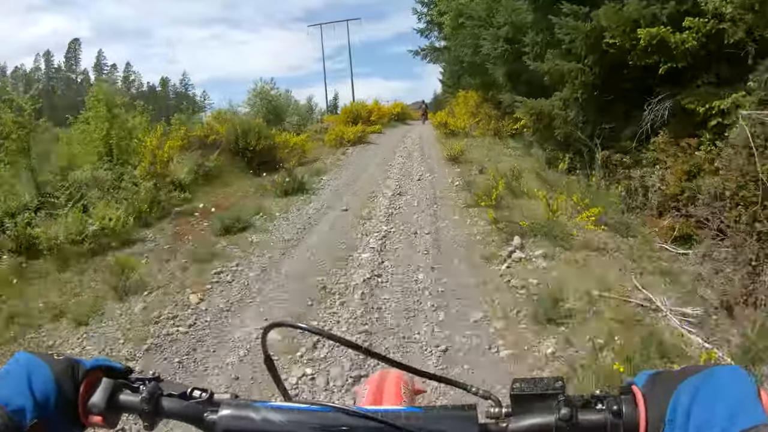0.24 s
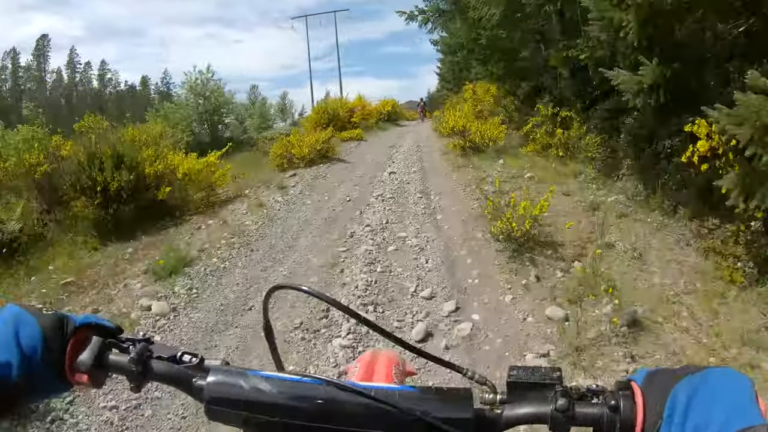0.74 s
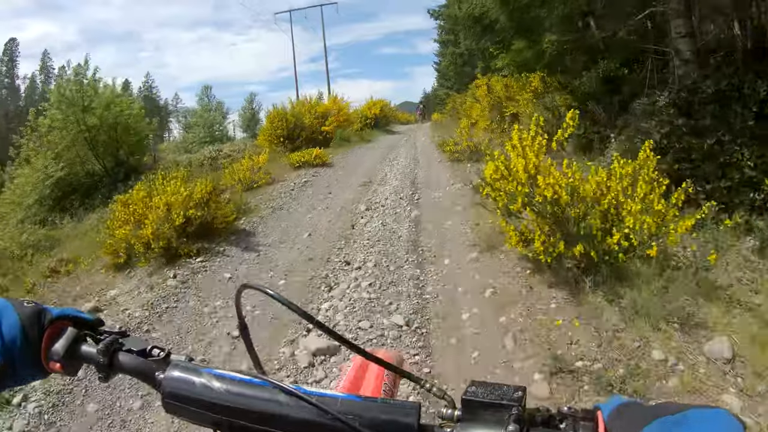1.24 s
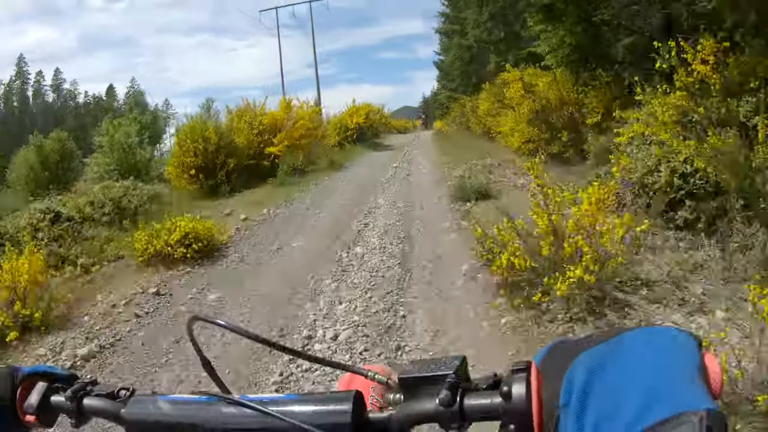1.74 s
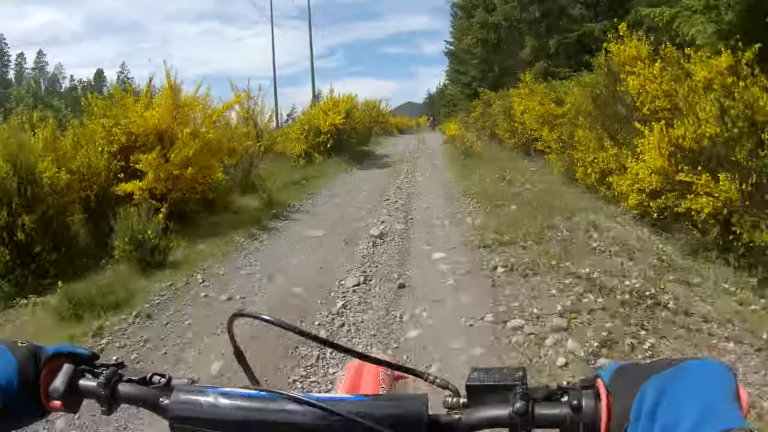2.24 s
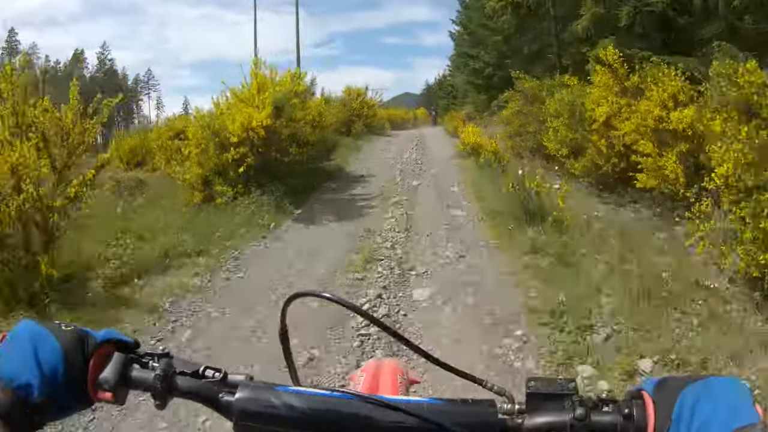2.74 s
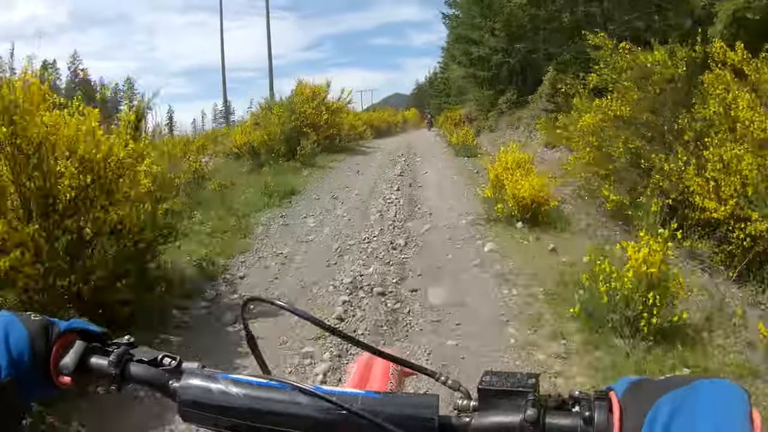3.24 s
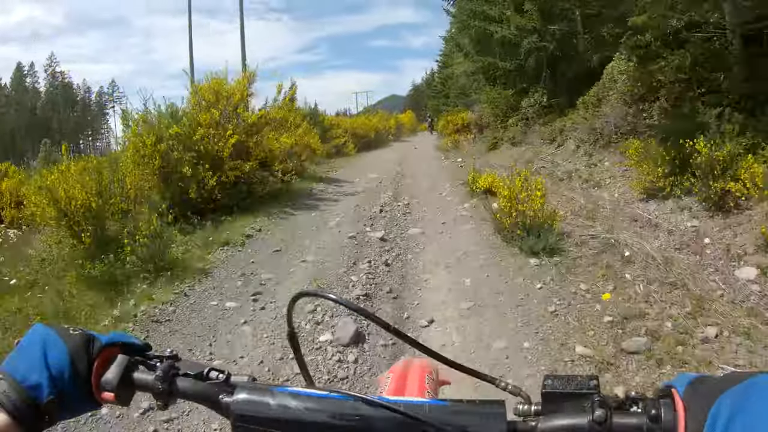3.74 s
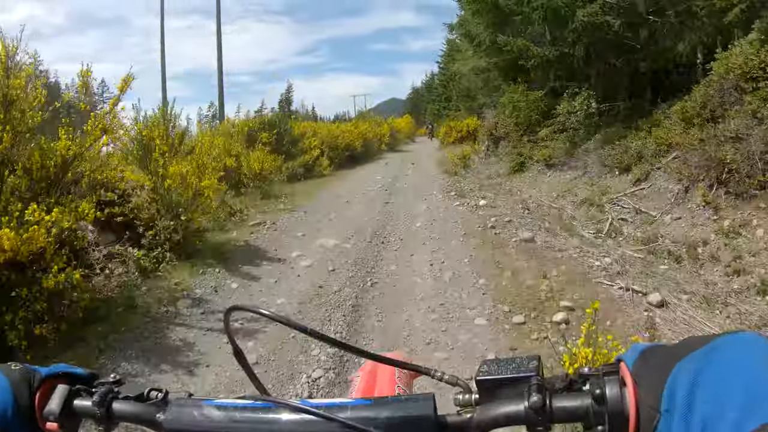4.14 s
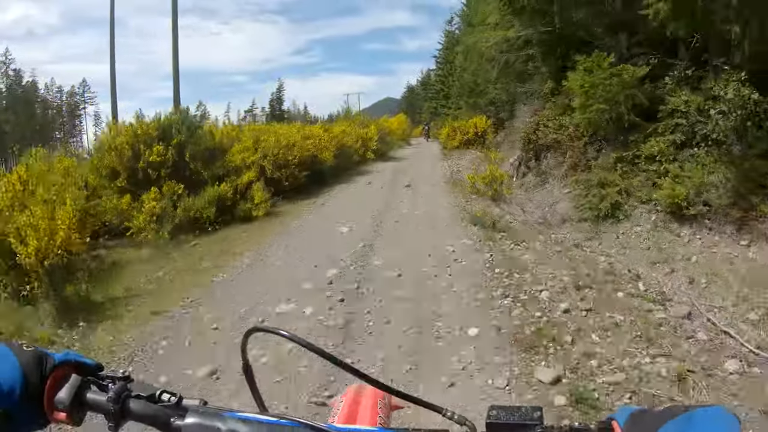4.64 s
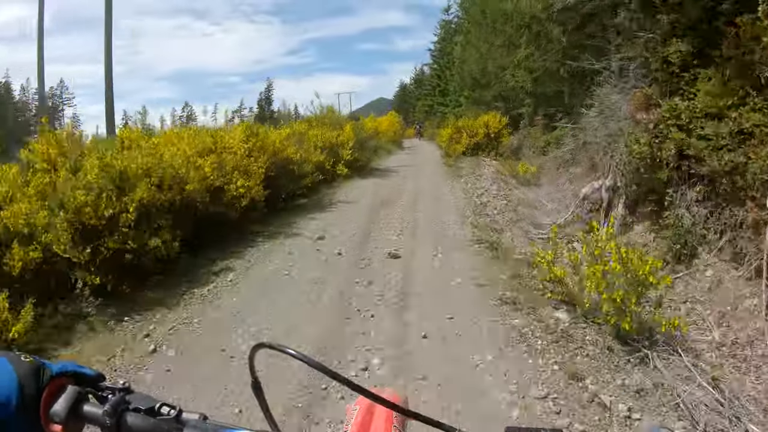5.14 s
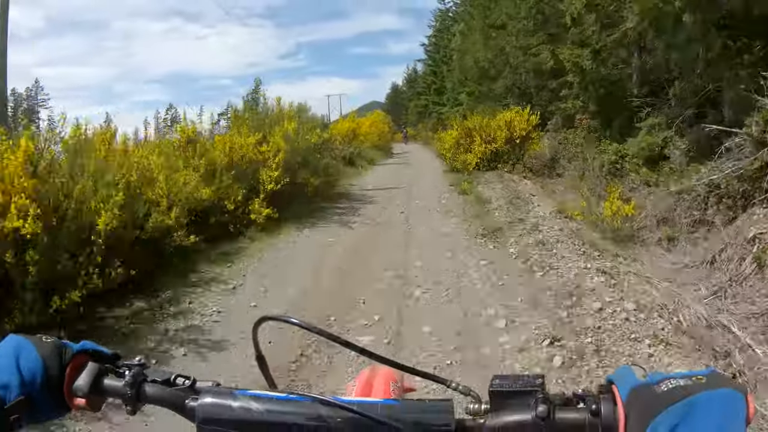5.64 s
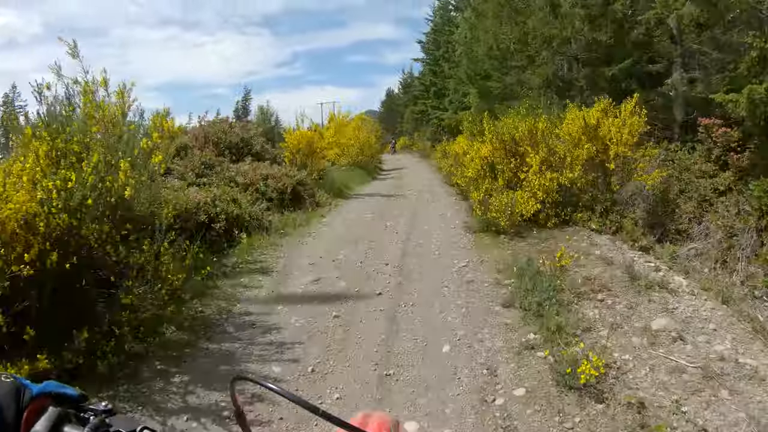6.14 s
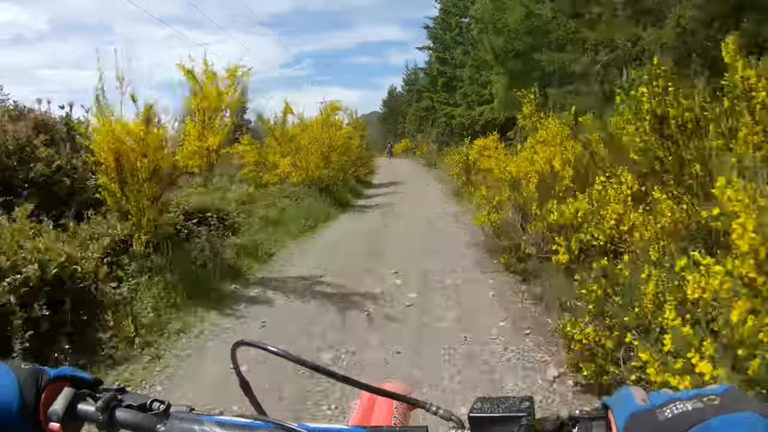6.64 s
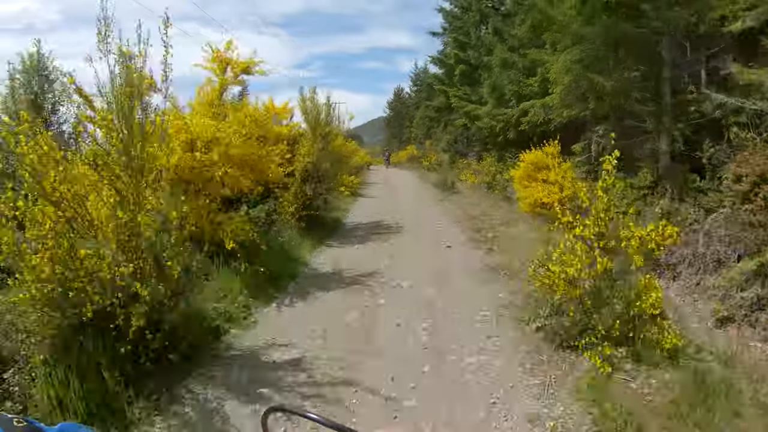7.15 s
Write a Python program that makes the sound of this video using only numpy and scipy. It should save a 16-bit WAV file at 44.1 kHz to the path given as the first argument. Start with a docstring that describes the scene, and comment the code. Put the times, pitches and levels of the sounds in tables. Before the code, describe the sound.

Close onboard sound of a trail motorcycle with a deep, rapid putter, backed by fine valve clatter and chain rustle. Loose gravel grinds under knobbly tyres, with small stones pinging off the bike and short metallic knocks, mostly in the first five seconds. The engine relaxes to a lower, softer note, then pulls hard and rises in pitch with a rough exhaust edge. Open air, no obvious reverberation, soft wind rumble on microphones worn by the rider.

```python
"""On a gravel trail, uphill: a single-cylinder four-stroke dirt bike cruises, then opens the throttle.
Firing pulses ring the silencer and the pipe, whose crack grows under load; summed cosines make the piston's throb.
Filtered noise pulses with the cycle as gas hiss, tappets and cam chain, and shakes the engine case.
Tyres crunch in noise and grains, stones tick and bumps clank in decaying bursts, and slow noise makes
the wind that buffets a pair of microphones on the rider."""
import sys
import numpy as np
from scipy import signal
from scipy.fft import rfft, irfft, next_fast_len
from scipy.io import wavfile
from scipy.ndimage import uniform_filter1d

SR = 44100
rng = np.random.default_rng(int(sys.argv[2]) if len(sys.argv) > 2 else 0)


def to_wav(s):
    """Save 16-bit WAV."""
    ch = np.atleast_2d(s).T  # columns
    pcm = np.round(np.clip(ch, -1, 1) * 32767)  # PCM
    wavfile.write(sys.argv[1], SR, pcm.astype(np.int16))


N = 326340
TIME = np.arange(N) / SR


def undb(db):
    """Decibels to gain."""
    return 10 ** (np.asarray(db) / 20)


def curves(table):
    """The columns of a table, joined by straight lines in time."""
    s, *columns = np.transpose(table)
    return [np.interp(TIME, s, column) for column in columns]


def unit(x):
    """Scale to an rms of one."""
    return x / np.sqrt(np.mean(x ** 2))


def steady(x):
    """Hold the running rms of the centre image near one, so that a level curve sets the loudness."""
    power = np.atleast_2d(x).mean(axis=0) ** 2
    for _ in range(2):
        power = uniform_filter1d(power, size=SR // 7)
    return x / np.sqrt(power + 1e-18)


def walk(rate):
    """Random drift: levels held for 1 / rate seconds, smoothed twice and scaled to a spread near one."""
    hold = int(SR / rate)
    drift = np.repeat(rng.standard_normal(N // hold + 1), hold)
    for _ in range(2):
        drift = uniform_filter1d(drift, hold)
    return unit(drift)[:N]


def colour(x, points, size=8192):
    """Causal minimum-phase filter through (f/Hz, level/dB) points: it rings after a blow, never before."""
    hz, db = np.transpose(points)
    bins = np.maximum(np.fft.rfftfreq(size, 1 / SR), 1)
    gain = undb(np.interp(np.log(bins), np.log(hz), db))
    cepstrum = irfft(np.log(gain))
    # fold the cepstrum forward in time, which makes the response causal
    cepstrum[1:size // 2] *= 2
    cepstrum[size // 2 + 1:] = 0
    response = irfft(np.exp(rfft(cepstrum)))[:size // 2]
    return signal.fftconvolve(np.atleast_2d(x), response[None], axes=1)[:, :N]


def resonate(x, modes, top_hz=4500):
    """Ring modes of alternating sign, duller above top_hz, each with its own lag between the microphones."""
    size = next_fast_len(N + SR // 4)
    f = np.maximum(np.fft.rfftfreq(size, 1 / SR), 1)
    response = 0
    for k, (hz, width, db, lead_ms) in enumerate(modes):
        ring = (-1) ** k * undb(db) / (1 + 1j * (f * f - hz * hz) / (f * width))
        # the left leads by half the time and the right trails by half
        turn = np.exp(1j * np.pi * f * lead_ms / 1000)
        response = response + ring * np.array([turn, turn.conj()])
    dulling = 1 + (f / top_hz) ** 4
    return irfft(rfft(x, size) * response / dulling, size)[:, :N]


def noise(points, side_db):
    """Coloured stereo noise; side_db sets its width against the centre."""
    mid, side = colour(rng.standard_normal((2, N)), points)
    return unit(mid) + undb(side_db) * unit(side) * np.array([[1], [-1]])


def pan(x, left_db):
    """Lean a sound to the left by a level difference between the channels."""
    return x * undb(np.array([[left_db], [-left_db]]) / 2)


def firings(cycle, scatter_db, jitter_ms):
    """One pulse per engine cycle, each with its own strength and a slightly uneven moment."""
    count = np.arange(1, int(cycle[-1]) + 1)
    chance = rng.standard_normal((len(count), 2))
    at = np.interp(count, cycle, np.arange(N)) + chance[:, 0] * jitter_ms * SR / 1000
    at = np.clip(at, 0, N - 2)
    i = at.astype(int)
    strength = undb(scatter_db * chance[:, 1])
    # share each pulse between the two nearest samples
    pulses = np.zeros(N)
    pulses[i] = strength * (1 - at % 1)
    pulses[i + 1] = strength * (at % 1)
    return pulses


def gate(cycle, centre, sharpness):
    """A smooth swell once a cycle, centred on a phase."""
    return unit(np.exp(sharpness * np.cos(2 * np.pi * (cycle - centre))))


def echo(x, delay_ms, db):
    """Add one reflection."""
    return x + undb(db) * np.interp(TIME - delay_ms / 1000, TIME, x, left=0)


def blows(table, decay_s):
    """A sudden rise and an exponential fall for each (t/s, level/dB) row."""
    out = np.zeros(N)
    for s, db in table:
        start = int(s * SR)
        out[start:] += undb(db) * np.exp(-TIME[:N - start] / decay_s)
    return out


# the bike's pace as a firing rate, before skips: t/s, f/Hz
PACE = [(0.0, 54), (0.18, 50.78), (0.627, 51.66), (0.869, 48.66), (1.215, 50.04), (2.241, 46.48),
        (3.594, 44.27), (3.937, 46.28), (4.781, 45.36), (5.13, 47.71), (5.254, 50.42), (5.516, 51.22),
        (6.056, 55.54), (6.288, 59.75), (6.606, 58.82), (6.871, 62.8), (7.061, 60.9), (7.271, 65.36),
        (7.4, 64.27)]
# rear wheel skips and the engine flares (+), or bites and it sags (-): t/s, peak change of firing rate f/Hz
SKIPS = [(1.1, 1.78), (1.859, -1.51), (2.74, 2), (3.73, 2), (3.82, -0.5), (3.9, 2.13), (4.21, 3.5),
         (4.33, -1.63), (5.2, 2.5)]
SKIP_S = .034  # time from a skip's peak to 1/e of it


def engine_speed():
    """The firing rate follows the bike's pace, with a brief flare or sag wherever the rear wheel skips or bites."""
    pace, = curves(PACE)
    return pace + sum(change * np.exp(-((TIME - s) / SKIP_S) ** 2) for s, change in SKIPS)


def charge(throttle):
    """How full the cylinder gets: quickly at first, then less as the throttle opens."""
    return np.sqrt(throttle)


# piston throb partials: multiple of the firing rate, relative level/dB
THROB = [(1, -9), (2, 2.5), (3, -10.5)]
# silencer response with the throttle shut: f/Hz, relative level/dB
SILENCER_COOL = [(100, -51.5), (175, -6.5), (208, -16), (232, -4), (285, 0), (325, 1.5), (370, -2),
                 (415, -6.5), (455, -18.5), (500, -38.5), (700, -41), (15000, -130)]
# silencer response with hot gas at full throttle: f/Hz, relative level/dB
SILENCER_HOT = [(100, -45), (165, -28), (205, -22.5), (250, -11.5), (290, 1.5), (310, 7.5), (330, 5),
                (358, 2.5), (385, -2.5), (425, -2.5), (465, -15), (520, -41.5), (700, -58.5), (15000, -130)]
# level with the throttle shut and what full throttle adds, dB; then dB per Hz of firing rate above easy pace
THROB_DB, THROB_LOAD_DB = -21, 6
SILENCER_DB, SILENCER_LOAD_DB, SILENCER_DB_PER_HZ = -14.5, 0.1, -0.04


def engine_body(cycle, throttle, revs):
    """The piston pumps air on both crank turns of a cycle, and each firing rings the silencer."""
    throb_db = THROB_DB + THROB_LOAD_DB * charge(throttle)
    silencer_db = SILENCER_DB + SILENCER_LOAD_DB * throttle + SILENCER_DB_PER_HZ * revs
    lag = 0.19 + 0.13 * throttle  # in cycles: the air swings later under load
    swings = [-undb(db) * np.cos(2 * np.pi * multiple * (cycle - lag)) for multiple, db in THROB]
    gulp = 0.37 * throttle ** 2 * swings[0]  # an open throttle draws a deeper gulp of air once a cycle
    throb = unit(sum(swings) + gulp) * undb(throb_db + 0.23 * walk(25))
    pulses = firings(cycle, scatter_db=-0.09, jitter_ms=0.075)
    cool = colour(pulses * (1 - throttle), SILENCER_COOL)
    hot = colour(pulses * throttle, SILENCER_HOT)
    return throb + steady(-cool - hot) * undb(silencer_db)


# low pipe resonances that bark: f/Hz, width/Hz, relative level/dB, lead at the left microphone/ms
BARK = [(598.7, 68, 5, 0.21), (669, 80, 2, 0.18), (792, 350, -8.5, 0.45)]
# higher pipe resonances that rasp: f/Hz, width/Hz, relative level/dB, lead at the left microphone/ms
RASP = [(718, 214, 7.5, 0.37), (888, 125, 8.5, 0.31), (1070, 48, 8, 0.57), (1205, 44, -3.5, -0.32),
        (1370, 55, -1.5, -0.12), (1667, 59, -2, -0.1), (1926, 150, -4, -0.11), (2320, 1600, -19, 0.024)]
# colour of the gas jet: f/Hz, relative level/dB
JET = [(700, -19.5), (1250, 2.5), (1500, -1), (2000, -6), (3000, -3), (4200, -12), (7000, -32.5),
       (15000, -69)]
# level with the throttle shut and what full throttle adds, dB; then dB per Hz of firing rate above easy pace
BARK_DB, BARK_LOAD_DB, BARK_DB_PER_HZ = -38, 10, .08
RASP_DB, RASP_LOAD_DB, RASP_DB_PER_HZ = -45.5, 9.5, 0.4
JET_DB, JET_LOAD_DB = -50, 10


def exhaust(cycle, throttle, revs):
    """The blow-down front rings the pipe, and a jet of gas hisses after it; bark, rasp and hiss grow under load."""
    bark_db = BARK_DB + BARK_LOAD_DB * charge(throttle) + BARK_DB_PER_HZ * revs
    rasp_db = RASP_DB + RASP_LOAD_DB * throttle + RASP_DB_PER_HZ * revs
    jet_db = JET_DB + JET_LOAD_DB * throttle
    gas = rng.standard_normal(N) * gate(cycle, centre=0.12, sharpness=1.6)
    front = unit(firings(cycle, scatter_db=.9, jitter_ms=.025))
    bark = pan(steady(resonate(front, BARK)), left_db=4.0) * undb(bark_db)
    crack = -echo(front, delay_ms=3.652, db=-10.5)  # the front returns from the pipe's end
    rasp = pan(steady(resonate(crack, RASP)), left_db=2.0) * undb(rasp_db)
    hiss = pan(unit(colour(gas, JET)), left_db=5.0) * undb(jet_db)
    return bark + rasp + hiss


# colour of the tappets: f/Hz, relative level/dB
TAPPETS = [(4000, -32.5), (6000, -13), (8100, -8.5), (8800, -2.5), (9700, -6.5), (11000, -16),
           (12100, -12.5), (13000, -24.5), (15000, -25.5)]
# colour of the cam chain: f/Hz, relative level/dB
CHAIN = [(3000, -37), (4400, -6.5), (4850, -2.5), (5300, -11), (7000, -31)]
# cam chain fader, before its flutter: t/s, level/dB
CHAIN_LEVEL = [(0, -53), (2.1, -51), (3.6, -55.5), (4.55, -51), (5, -51), (5.5, -60), (7.4, -57.5)]
# engine case and frame modes: f/Hz, width/Hz, relative level/dB, lead at the left microphone/ms
CASE = [(1352, 29, -14, 0), (1653, 76, -0.5, 0.0081), (1796, 110, -0.5, 0.0076), (2322, 40, 0, 0.0071),
        (2850, 130, -6, 0), (3810, 95, -9, 0.0071)]
TAPPET_DB, TAPPET_LOAD_DB = -58.5, -5.5  # level with the throttle shut, and what full throttle adds
TAPPET_SHAKE = .6  # share of the trail's dB swings that the tappets follow


def valve_gear(cycle, throttle):
    """Tappets and cam chain rustle at their own points of the cycle, while wavering noise rings the engine case."""
    chain_db, = curves(CHAIN_LEVEL)
    trail_db, = curves(TRAIL)
    tappet_db = TAPPET_DB + TAPPET_LOAD_DB * throttle + TAPPET_SHAKE * (trail_db - trail_db.mean())
    tappets = noise(TAPPETS, side_db=4.5) * gate(cycle, centre=0.46, sharpness=0.93)
    tappets = tappets * undb(tappet_db + 3.4 * walk(55))
    chain = noise(CHAIN, side_db=-20.5) * gate(cycle, centre=0.77, sharpness=.55)
    chain = chain * undb(chain_db + 1.5 * walk(22))
    # each mode wavers on its own
    case = sum(resonate(rng.standard_normal(N) * undb(2.7 * walk(3.97)), [mode]) for mode in CASE)
    case = pan(unit(case), left_db=4.5) * undb(trail_db + 5.5)  # rough ground shakes it harder
    return tappets + chain + case


# roughness of the trail, which also shakes the valve gear: t/s, relative level/dB
TRAIL = [(0, -51), (1.15, -51.5), (1.8, -47.5), (2.5, -53), (3.4, -52.5), (4.2, -50), (4.7, -53),
         (5.3, -51), (7.4, -50)]
# colour of the gravel crunch, also of a jolt's knock: f/Hz, relative level/dB
CRUNCH = [(150, -10), (450, 11), (800, 2.5), (1200, 1.5), (1750, -3), (2600, -4.5), (3600, -8.5),
          (5000, -14.5), (6500, -15.5), (9000, -21), (11000, -28.5), (15000, -49)]


def tyres():
    """Knobbly tyres grind the gravel: a dense crunch with sharper grains in it."""
    trail_db, = curves(TRAIL)
    struck = rng.random(N) < 1000 / SR  # about 1000 grains a second
    sizes = undb(3 * np.minimum(rng.exponential(size=N), 3.5)) * struck
    grains = undb(-8) * unit(colour(rng.standard_normal((2, N)) * sizes, CRUNCH))
    crunch = noise(CRUNCH, side_db=-4.0) * undb(1.33 * walk(30))
    return pan(crunch + grains, left_db=2.0) * undb(trail_db + 14.0)


# colour of a stone's tick: f/Hz, relative level/dB
STONE = [(1200, -21), (2500, -7), (5000, 1), (7500, 1), (9500, -6), (12000, -21), (15000, -22)]
# stones that strike the bike: t/s, relative level/dB
STONES = [(1.0349, -37), (1.1941, -36), (1.8793, -40), (2.7204, -35), (3.052, -36.5), (3.8526, -34),
          (3.933, -33), (4.167, -31), (4.1897, -36.5), (4.4472, -30), (4.5805, -37)]
# bumps that jolt the frame: t/s, relative level/dB
JOLTS = [(0.9695, -30.5), (1.88, -22), (3.7435, -27), (3.8283, -20)]
TICK_DB, TICK_S = -8.5, 0.012  # trim of a stone's rattle, and its fall to 1/e
KNOCK_DB, CLANK_DB = -12, -9  # trims of a jolt's dull knock and of its ring


def stones():
    """Flung stones tick on the bike and rattle away; bumps knock the frame and make it clank."""
    ticks = noise(STONE, side_db=-6) * blows(STONES, decay_s=TICK_S) * undb(TICK_DB)
    knock = noise(CRUNCH, side_db=-6) * undb(KNOCK_DB)
    clank = unit(resonate(rng.standard_normal(N), CASE)) * undb(CLANK_DB)
    return ticks + (knock + clank) * blows(JOLTS, decay_s=0.0081)


# colour of the wind: f/Hz, relative level/dB
WIND = [(10, -20), (25, -3.5), (55, -8), (100, -10), (160, -18.5), (300, -17.5), (600, -42), (1500, -76.5)]
WIND_DB, GUST_DB, GUST_HZ = -26, 0.96, 2.5  # base level; rms depth and rate of the gusts


def wind():
    """The riding wind buffets the microphones in gusts, stronger in the centre than at the sides."""
    buffet = noise(WIND, side_db=-5) * undb(0.99 * walk(12))
    return buffet * undb(WIND_DB + GUST_DB * walk(GUST_HZ))


# throttle opening: t/s, opening (0 shut to 1 full)
THROTTLE = [(0, 0.4), (.55, 0.29), (.9, 0.27), (1.15, 0.37), (1.8, .25), (2.4, 0.05), (3.3, 0.02),
            (3.9, .22), (4.8, 0.04), (5.05, .2), (5.25, 0.76), (6.2, 1), (7.4, 0.9)]
START_PHASE = .77  # where in the engine cycle the sound begins, in cycles
CRUISE_HZ = 46.5  # firing rate at an easy pace


def scene():
    """One engine cycle and one throttle drive the engine sounds; tyres, stones and wind join them."""
    hz = engine_speed()
    cycle = START_PHASE + np.cumsum(hz) / SR
    revs = hz - CRUISE_HZ
    throttle = np.clip(curves(THROTTLE)[0], 0, 1)
    engine = engine_body(cycle, throttle, revs) + exhaust(cycle, throttle, revs) + valve_gear(cycle, throttle)
    return engine + tyres() + stones() + wind()


TOP_HZ = 15400  # upper edge of the passband


def record(dry):
    """Round the very loudest peaks, close with a brief fade and cut the top with a steep low-pass."""
    rounded = dry / (1 + (dry / .86) ** 12) ** (1 / 12)
    faded = rounded * np.minimum((TIME[-1] - TIME) / .002, 1)
    low_pass = signal.ellip(8, .2, 70, TOP_HZ, fs=SR, output="sos")
    return signal.sosfilt(low_pass, faded)


dry = scene()
out = record(dry)
to_wav(out)
```